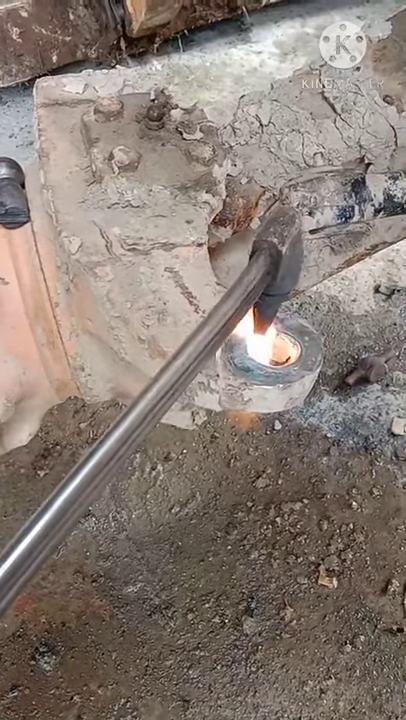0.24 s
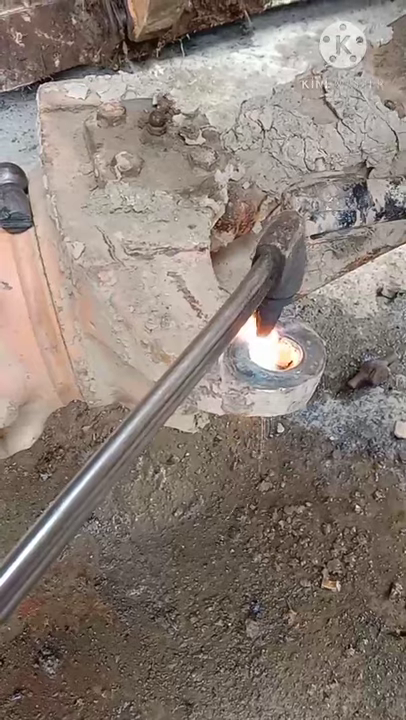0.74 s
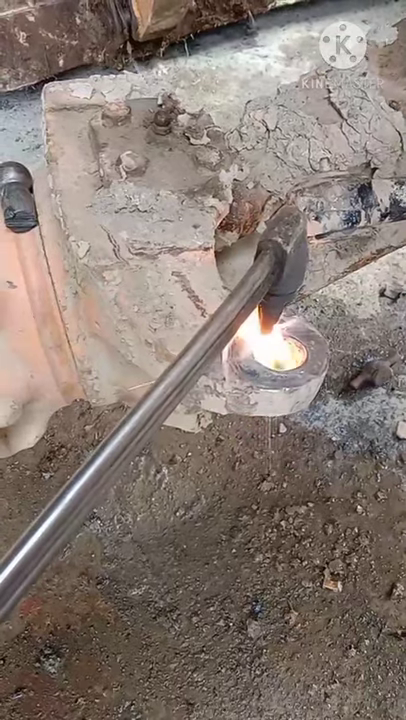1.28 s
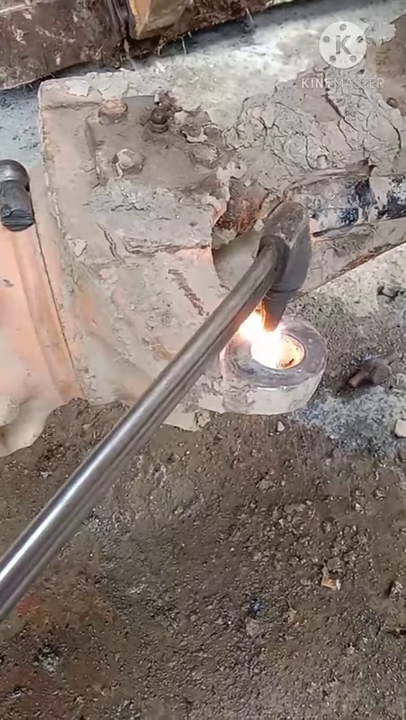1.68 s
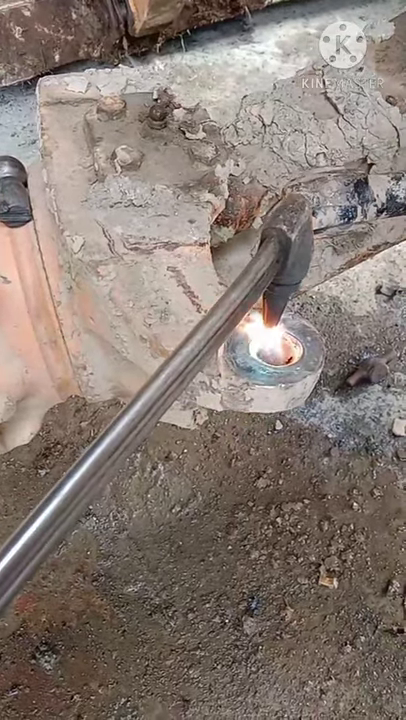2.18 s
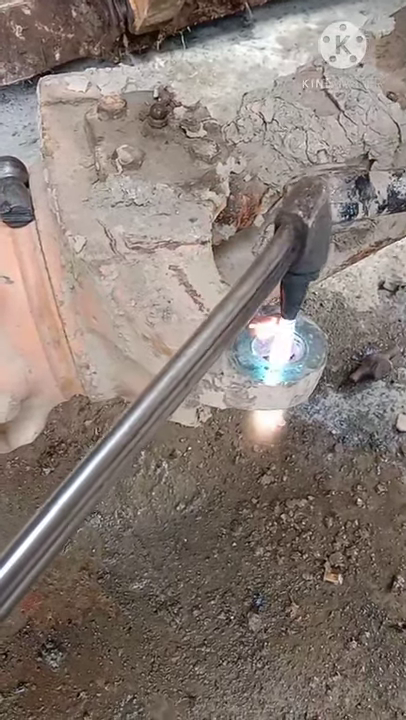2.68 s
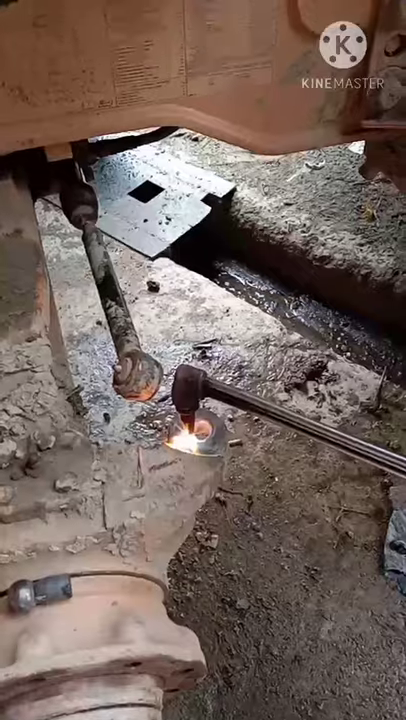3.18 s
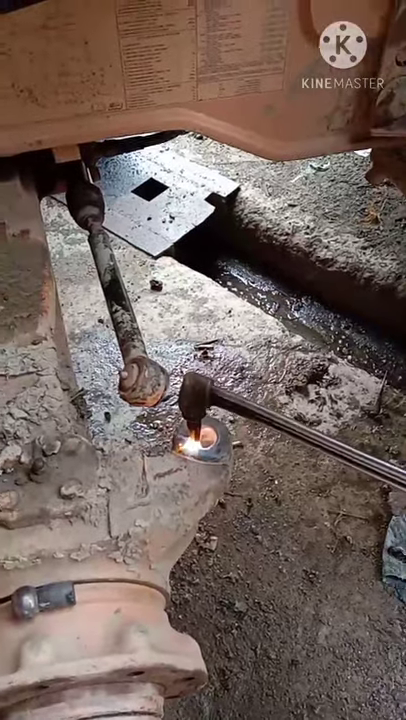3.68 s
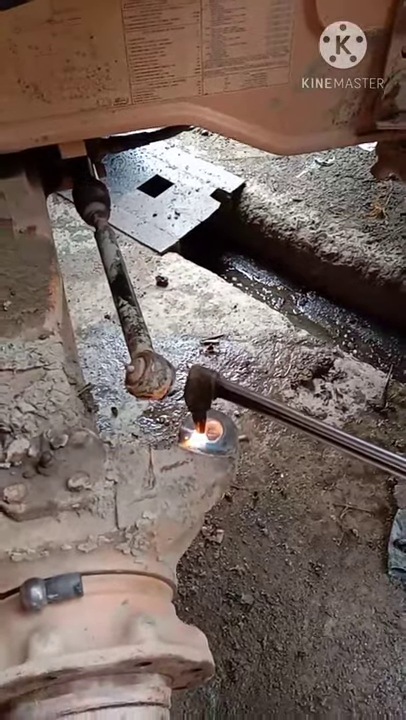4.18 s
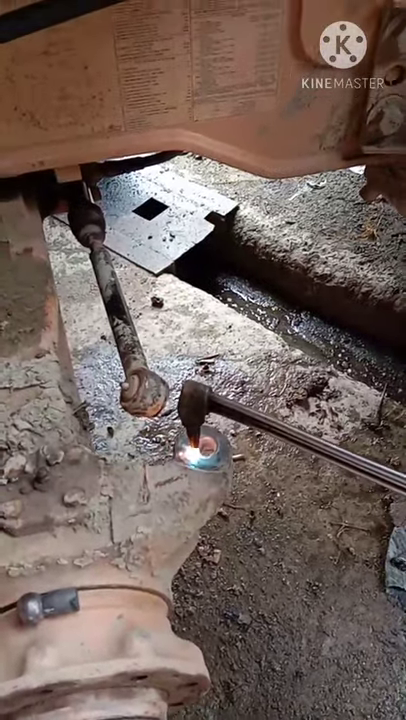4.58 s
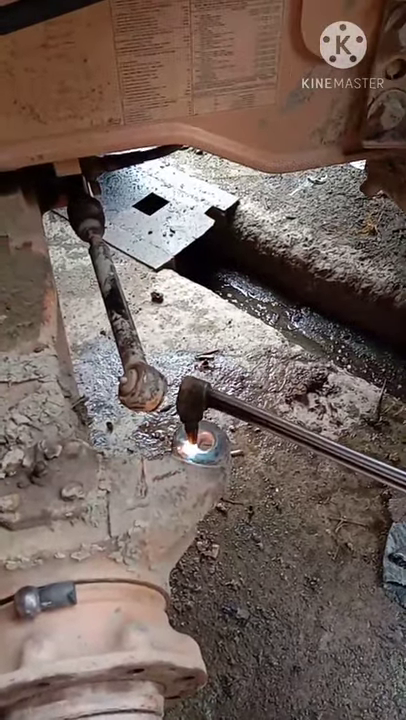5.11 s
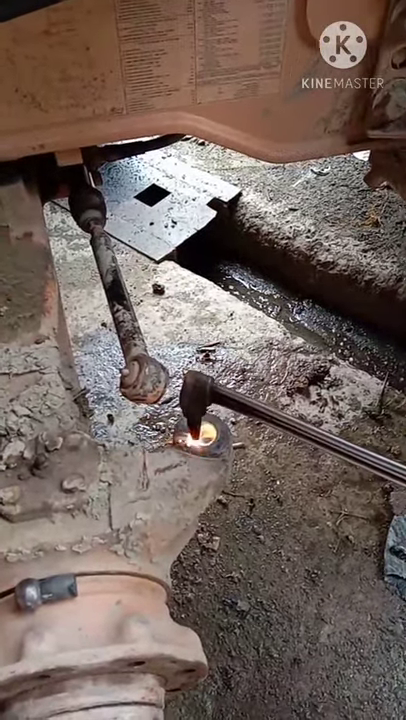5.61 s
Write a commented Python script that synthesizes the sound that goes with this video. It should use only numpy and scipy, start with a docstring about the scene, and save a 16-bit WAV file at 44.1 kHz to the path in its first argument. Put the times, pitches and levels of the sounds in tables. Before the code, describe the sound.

Breathy, coloured flame noise from a torch heating metal under heavy machinery, heard near in mono. The oxygen lever opens a sharp hiss that chokes the low roar, which then returns with deep flutter. A hard cut leaves a momentary gap; the same torch then fades in at a more distant position, flutters, hisses strongly for about a second and settles back to flame.

```python
"""A gas torch heats the bore of a steel part under heavy machinery, heard in mono.
First, at a near place, the flame roars in the bore, flutters low and blows over its rim: shaped noise.
Presses of the oxygen lever open a hissing jet and choke the roar; then the torch points down the bore.
The sound cuts off abruptly with a faint ring; after a short silence a farther place fades in,
where the flame burns on and the jet opens twice more."""
import sys
import numpy as np
from scipy import signal
from scipy.fft import rfft, irfft
from scipy.io import wavfile
from scipy.ndimage import uniform_filter1d

SR = 44100
rng = np.random.default_rng(int(sys.argv[2]) if len(sys.argv) > 2 else 0)


def put_to_file(sound):
    """Save the sound as 16-bit audio at rate SR, in the file named by the first command-line argument."""
    columns = np.atleast_2d(sound).T  # one column per channel
    safe = np.clip(columns, -1, 1)
    whole_steps = np.round(safe * 32767)
    wavfile.write(sys.argv[1], SR, whole_steps.astype(np.int16))


N = 257984

# Peaks and hollows from the steel and ground around each place, and of the near place once the torch
# points down the bore. Each row: centre in Hz, width in Hz, height in dB.
NEAR_PLACE = [(160, 76, -11), (358, 156, 6.5), (474, 146, -11.5), (740, 270, 8.5), (887, 206, -4),
              (1375, 410, 5.5), (1543, 87, -7), (1973, 54, -5.5), (2235, 130, -8.5), (2743, 170, 8.5),
              (3204, 190, -5.4), (3477, 250, 8.5), (4004, 190, -9), (4280, 80, 3), (4480, 130, -6),
              (4410, 704, -3), (4750, 310, 9), (5195, 290, -6), (5450, 430, 8.5), (6410, 160, 4),
              (6730, 179, -4), (6700, 133, -3), (8640, 517, -5), (9712, 294, -2.5), (10000, 141, 6),
              (10536, 217, -4), (11200, 204, 0.5), (11930, 231, 4), (12800, 349, 7), (13958, 900, -2.5)]
FAR_PLACE = [(202, 83, -2), (328, 64, 5), (410, 130, -4.5), (590, 72, 5.5), (720, 79, -8), (947, 320, 6),
             (1165, 93, 5), (1274, 57, -10), (1542, 196, 9), (1693, 162, -9.5), (1840, 230, 6),
             (2356, 390, -8.5), (2730, 106, 6.5), (3000, 255, 0), (3130, 110, -3.8), (3300, 380, 1),
             (3730, 180, -5.5), (3810, 71, 5), (4360, 120, -6.5), (4560, 97, 0), (5400, 90, -3.5),
             (6049, 122, 0), (6800, 830, 4), (8460, 165, -1.5), (8620, 270, 6), (8858, 190, 0.5),
             (9150, 502, 2), (11000, 407, 1.5), (12645, 889, 2.5), (13797, 848, 4.5)]
THROUGH_BORE = [(373, 180, 8.5), (482, 100, -17), (754, 205, 9), (950, 106, -11.5), (1043, 62, 10),
                (1213, 82, 7), (1610, 38, -2), (1945, 120, 6), (2010, 69, -11), (2240, 205, -6),
                (2850, 140, 7), (3330, 157, -10.3), (3480, 470, 7.5), (4100, 720, -10), (4314, 180, 6),
                (5500, 220, -1), (6700, 183, -6.5), (8500, 430, 7.5), (8955, 690, -6), (9808, 344, 2),
                (10592, 900, 6.7), (10690, 332, -9.8), (11616, 249, -4), (12014, 231, 8), (12400, 900, -2),
                (13347, 361, -4.2), (14206, 326, -5), (14629, 352, 7), (14952, 253, -0.5), (15391, 265, 5)]
# Broad spectra of the parts of the flame at each place, before the place colours them.
# Each row: frequency in Hz (for the blow, at pitch factor 1), relative density in dB per Hz.
NEAR_ROAR = [(40, -44), (110, -28), (200, -1.5), (350, -1), (700, 0), (1200, -1.5), (2000, -3.5),
             (4000, -11.5), (15000, -55)]
FAR_ROAR = [(40, -45), (110, -43), (200, -6.5), (350, -6), (700, -3.5), (1200, -3), (2000, -5), (4000, -14),
            (15000, -55)]
NEAR_BLOW = [(400, -33), (1500, -5.5), (2800, -2), (4500, -1), (6200, -3.5), (7500, -11), (15000, -37.5)]
FAR_BLOW = [(400, -29), (1500, -6.5), (2800, -4), (4500, -3), (6200, -6), (7500, -12.5), (15000, -25.5)]
NEAR_JET = [(40, -37), (250, -23), (800, -7.5), (2500, -9.5), (7000, 3.5), (9500, 0.5), (12500, 1),
            (14000, 1.5), (15300, 1.5)]
FAR_JET = [(40, -23), (250, -38), (800, -5.5), (2500, -5), (7000, 6.5), (9500, 4), (12500, 4.5),
           (14000, 2.5), (15300, 7)]
# Bands in which the levels of roar, blow and jet are meant. Each row: lower edge in Hz, upper edge in Hz.
LEVEL_BANDS = [(200, 1200), (2500, 6000), (8000, 15000)]
# Spectrum of the low flutter. Each row: frequency in Hz, relative amplitude in dB.
RUMBLE_SPECTRUM = [(15, -27), (35, -24.5), (70, -13.5), (110, 0), (150, 6), (200, -8.5), (300, -16.5)]
# Level of the rumble with the lever at rest. Each row: time in seconds, level in dB.
RUMBLE_LEVEL = [(0.1, -55), (0.32, -56), (0.43, -41), (1.15, -41), (1.3, -51), (1.47, -45.5), (1.8, -60),
                (2.3, -54), (2.72, -36), (2.85, -42), (3.15, -36.5), (3.4, -54), (3.8, -39), (4.04, -54),
                (4.2, -44), (4.49, -39), (4.62, -46), (4.9, -54), (5.2, -50), (5.42, -35), (5.75, -43),
                (5.85, -35)]
# Thin, high spurts of oxygen as the lever cracks open. Each row: centre in seconds, length in seconds,
# level in dB.
SPURTS = [(1.48, .12, -36), (4.63, .15, -27), (5.78, 0.04, -29)]
# The flame apart from the full jet, as the torch wanders over the bore. Each row: time in seconds,
# unchoked roar in dB, blow over the rim with the jet shut in dB, nozzle hiss in dB.
FLAME = [(0, -27, -28, -37), (0.07, -26.5, -33, -38), (0.14, -24.5, -23.5, -39), (0.32, -27, -25, -42),
         (0.45, -22, -29, -36), (0.85, -24, -23.5, -37), (1.0, -20.5, -26.5, -36), (1.3, -25, -24, -34),
         (1.62, -25, -18.5, -34), (1.87, -25, -21, -35.5), (2.0, -22.5, -22.5, -36),
         (2.08, -24, -21.5, -34), (2.25, -26, -25.5, -34), (2.53, -23, -24.5, -37), (2.66, -21, -32, -45),
         (2.8, -22.5, -33.5, -44), (3.15, -23, -33, -43.5), (3.3, -30.5, -34.5, -43),
         (3.7, -27, -30.5, -40), (3.85, -24, -31, -36), (4.2, -25, -32.5, -38), (4.48, -29, -29.5, -41),
         (4.68, -29.5, -30, -40), (4.98, -22.5, -30, -40), (5.2, -31, -31, -40), (5.42, -27, -31.5, -29),
         (5.53, -26.5, -28, -29.5), (5.65, -26, -29.5, -45), (5.85, -27, -30, -41)]
# Presses of the oxygen lever. Each row: opens in seconds, opening time in seconds, starts to shut in
# seconds, closing time in seconds, jet level in dB, change of the jet while held in dB, change of the
# choked roar in dB, roar starts to return in seconds, time to return in seconds.
LEVER_PRESSES = [(-0.4, 0.03, 0.05, 0.2, -31, -5, -15.5, 0.07, 0.11),
                 (1.26, 0.2, 1.48, 0.22, -27, -2.5, -1.5, 1.5, 0.1),
                 (1.905, 0.038, 2.502, 0.25, -22.5, -5, -21, 2.45, 0.27),
                 (4.485, 0.037, 5.38, 0.14, -21, -1.5, -15, 5.5, 0.15),
                 (5.7, 0.08, 5.785, 0.09, -32.5, 1, -0.5, 5.8, 0.1)]
# The torch turns to point down the bore. The row: start in seconds, end in seconds.
TORCH_TURNS = (2.5, 2.52)

SHUT_DB = -23.5  # jet at the foot of the lever's travel, relative to open
CHOKE_LAG_S, CHOKE_S = 0.043, 0.11  # the roar starts to die after the lag, and takes this long
RUMBLE_CHOKE = 0.72  # share of the roar's choking, in dB, that the rumble feels
BLOW_LIFT_DB, BLOW_SLIDE = 4, 0.14  # the jet at its strongest lifts the blow's level and, as a share, its pitch
NEAR_PITCH, FAR_PITCH = 0.99, 0.88  # blow pitch with the jet shut, as a factor
JET_COLOURING = 0.7  # share of the place's colour: the jet is heard more directly
CUT_S, RING_DB, RING_T60_S = 3.168, -29.5, 0.03  # the cut, and the faint ring after it
BACK_S, FADE_S, FADE_POWER = 3.274, 0.15, 1.12  # start, length and curve of the fade in
EDGE_HZ = 15470  # upper band limit
SIZE, HOP = 1024, 256  # spectral frames, in samples
HZ = np.fft.rfftfreq(SIZE, 1 / SR)
TIMES = np.arange(N // HOP + 5) * HOP / SR  # frame times in seconds


def gain_of(db):
    """A level in dB is twenty times the logarithm of an amplitude factor; this inverts it."""
    return 10 ** (np.asarray(db) / 20)


def read(points, hz):
    """A spectrum is interpolated linearly in dB over log frequency."""
    f, db = np.transpose(points)
    return np.interp(np.log(hz + 1), np.log(f + 1), db)


def blurred(hz_wide, s_long):
    """Averaging white chance over time and frequency correlates it in patches; its rms is 1."""
    frames_long = max(1, round(s_long * SR / HOP))
    bins_wide = max(1, round(hz_wide * SIZE / SR))
    field = rng.standard_normal((len(TIMES), len(HZ)))
    for _ in range(2):
        field = uniform_filter1d(field, frames_long, axis=0)
        field = uniform_filter1d(field, bins_wide, axis=1)
    return field.T / field.std()


def place_db(modes):
    """Reflecting surfaces colour a source: resonance-shaped peaks and hollows add up in dB."""
    hz, width, db = np.transpose(modes)
    detuning = 2 * (HZ[:, None] - hz) / width
    return (db / (1 + detuning ** 2)).sum(axis=1, keepdims=True)


def choking():
    """The opened jet starves the roar after a lag; its change in dB recovers as the roar returns."""
    choke_db = np.zeros(len(TIMES))
    for opens, *_, choked_db, returns, returning in LEVER_PRESSES:
        dying = np.clip((TIMES - opens - CHOKE_LAG_S) / CHOKE_S, 0, 1)
        remaining = np.clip(1 - (TIMES - returns) / returning, 0, 1)
        choke_db = np.minimum(choke_db, choked_db * dying * remaining)
    return choke_db


def oxygen_jet():
    """Lever travel governs the jet linearly in dB; while held, the level drifts as time squared."""
    jet = np.zeros(len(TIMES))
    for opens, opening, shuts, closing, db, sag_db, *_ in LEVER_PRESSES:
        lever = np.interp(TIMES, [opens, opens + opening, shuts, shuts + closing], [0, 1, 1, 0])
        held = np.clip((TIMES - opens) / (shuts - opens), 0, 1)
        level_db = db + sag_db * held ** 2 + SHUT_DB * (1 - lever)
        jet = np.maximum(jet, (lever > 0) * gain_of(level_db))
    return jet


def flame_levels():
    """The levels of roar, blow and nozzle hiss vary linearly in dB between the torch's positions."""
    s, *levels = np.transpose(FLAME)
    return [np.interp(TIMES, s, db) for db in levels]


def rumble(lumpy_db, lump_s, deep_db):
    """Unsteady burning gives a low flutter: low-pass noise whose amplitude swells in random lumps."""
    hz = np.fft.rfftfreq(N, 1 / SR)
    spectrum_db = read(RUMBLE_SPECTRUM, hz) + deep_db * (hz < 80)
    low = irfft(rfft(rng.standard_normal(N)) * gain_of(spectrum_db) * (hz < 600), N)
    lumps = rng.standard_normal(N)
    for _ in range(2):
        lumps = uniform_filter1d(lumps, round(lump_s * SR))
    low = low * gain_of(lumpy_db * lumps / lumps.std())
    level_db = np.interp(TIMES, *np.transpose(RUMBLE_LEVEL)) + RUMBLE_CHOKE * choking()
    return low / low.std() * gain_of(np.interp(np.arange(N) / SR, TIMES, level_db))


def spurts(low_hz):
    """A thin gas stream radiates mostly treble: smooth bumps of power, steeply rising towards low_hz."""
    s, length, db = np.transpose(SPURTS)
    bumps = np.exp(-(2 * (TIMES[:, None] - s) / length) ** 4)
    power = (gain_of(db) ** 2 * bumps).sum(axis=1)
    shape = (HZ < EDGE_HZ) / (1 + (low_hz / (HZ + 1)) ** 12)
    return shape[:, None] / shape.sum() * power


def part_power(level_db, spectrum, colour_db, band, slide=1):
    """A source spectrum times the place's response, scaled so that its power in the band is the level."""
    shape = gain_of(read(spectrum, HZ[:, None] / slide) + colour_db) ** 2
    lo, hi = band
    shape = shape / shape[(HZ > lo) & (HZ < hi)].sum(axis=0)
    return shape * gain_of(level_db) ** 2


def jet_power(spectrum, colour_db, dulling):
    """Jet noise and nozzle hiss add in power; a weaker jet loses its top above 8 kHz."""
    _, _, hiss_db = flame_levels()
    level_db = 10 * np.log10(oxygen_jet() ** 2 + gain_of(hiss_db) ** 2)
    closed_db = level_db - level_db.max()
    dull_db = dulling * closed_db * np.log2(np.maximum(HZ[:, None] / 8000, 1))
    return part_power(level_db, spectrum, JET_COLOURING * colour_db + dull_db, LEVEL_BANDS[2])


def blow_power(spectrum, colour_db, pitch):
    """Gas over the rim makes edge noise; faster gas from the open jet lifts its level and pitch."""
    _, blow_db, _ = flame_levels()
    jet = oxygen_jet()
    drive = jet / jet.max()
    slide = pitch * (1 + BLOW_SLIDE * drive)
    return part_power(blow_db + BLOW_LIFT_DB * drive, spectrum, colour_db, LEVEL_BANDS[1], slide)


def roar_power(spectrum, colour_db):
    """Turbulent combustion in the bore radiates a broad roar, weakened while the jet chokes it."""
    roar_db, _, _ = flame_levels()
    return part_power(roar_db + choking(), spectrum, colour_db, LEVEL_BANDS[0])


def turbulence(power, ripple_db, patchy_db, flicker_db):
    """Noise of the given power; echoes off clutter ripple it finely, eddies make patches and flicker."""
    lower = 1 + 1.1 / (1 + (HZ[:, None] / 500) ** 2)  # large slow eddies make the low end patchier
    ripple = ripple_db * blurred(50, 0.79)
    patches = patchy_db * lower * blurred(300, 0.06)
    flicker = flicker_db * blurred(5000, 0.012)
    unrest = gain_of(ripple + patches + flicker)
    unrest = unrest / np.sqrt(np.mean(unrest ** 2))
    a, b = rng.standard_normal((len(TIMES), len(HZ), 2)).T
    noise = a + 1j * b
    frames = dict(nperseg=SIZE, noverlap=SIZE - HOP)
    white = signal.istft(noise, **frames)[1].std() / np.sqrt(len(HZ))  # rms due to one bin
    return signal.istft(noise * np.sqrt(power) * unrest, **frames)[1][:N] / white


def flame(spectra, colour_db, pitch, dulling):
    """Independent noise sources add in power: spurts, jet, blow and roar over frequency and time."""
    roar, blow, jet = spectra
    power = spurts(low_hz=12500) + jet_power(jet, colour_db, dulling)
    return power + blow_power(blow, colour_db, pitch) + roar_power(roar, colour_db)


def near_place():
    """The radiation path sets the colour: it crossfades in dB as the torch turns down the bore."""
    turned = np.interp(TIMES, TORCH_TURNS, [0, 1])
    colour_db = (1 - turned) * place_db(NEAR_PLACE) + turned * place_db(THROUGH_BORE)
    power = flame([NEAR_ROAR, NEAR_BLOW, NEAR_JET], colour_db, NEAR_PITCH, dulling=0.05)
    burning = turbulence(power, ripple_db=2.5, patchy_db=1.0, flicker_db=0.6)
    return burning + rumble(lumpy_db=3.0, lump_s=0.04, deep_db=-3.0)


def far_place():
    """Other surroundings filter the flame differently: a fixed colour, a lower blow and a duller weak jet."""
    power = flame([FAR_ROAR, FAR_BLOW, FAR_JET], place_db(FAR_PLACE), FAR_PITCH, dulling=0.22)
    burning = turbulence(power, ripple_db=3.0, patchy_db=0.9, flicker_db=0.4)
    return burning + rumble(lumpy_db=4.5, lump_s=0.036, deep_db=3.0)


def scene():
    """Gains in time join the places: a cut with an exponential ring, a silence, a power-law fade in."""
    t = np.arange(N) / SR
    after = np.clip(t - CUT_S, 0, 1)
    ring = gain_of(RING_DB - 60 * after / RING_T60_S) * (t < BACK_S)
    cut = np.where(t < CUT_S, 1, ring)
    fade = np.clip((t - BACK_S) / FADE_S, 0, 1) ** FADE_POWER
    return np.tile(near_place() * cut + far_place() * fade, (2, 1))  # two equal channels


def record(dry):
    """A symmetric low-pass filter limits the band with the same delay at every frequency."""
    low_pass = signal.firwin(1023, EDGE_HZ, window=("kaiser", 9), fs=SR)
    return signal.oaconvolve(dry, low_pass[None], "same")


dry = scene()
out = record(dry)
put_to_file(out)
```